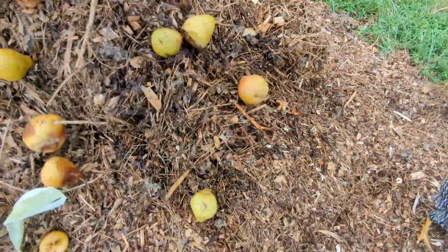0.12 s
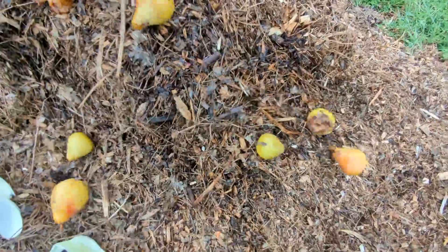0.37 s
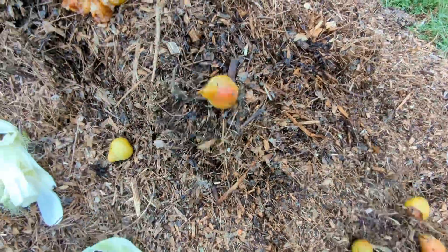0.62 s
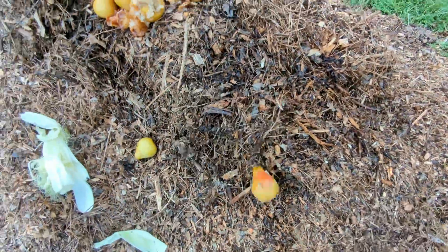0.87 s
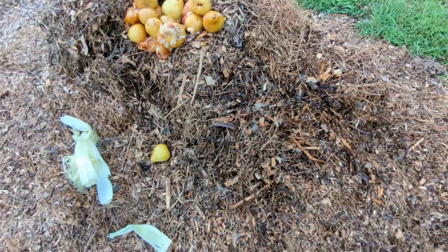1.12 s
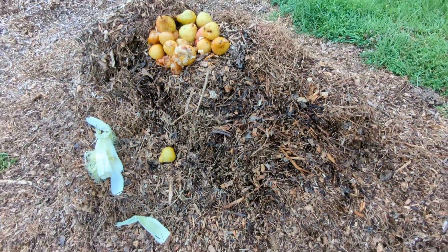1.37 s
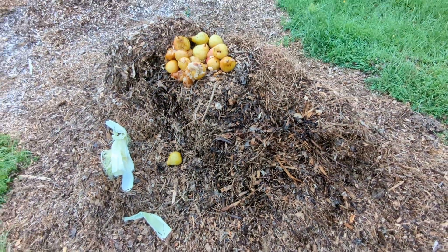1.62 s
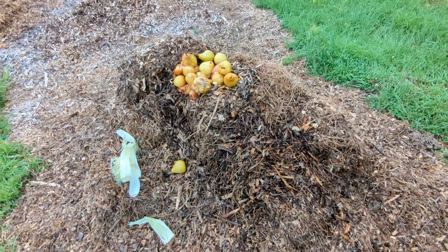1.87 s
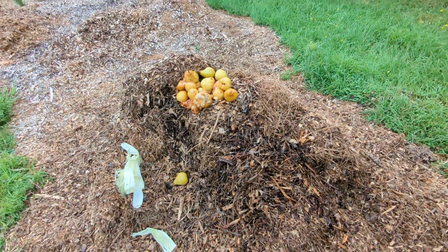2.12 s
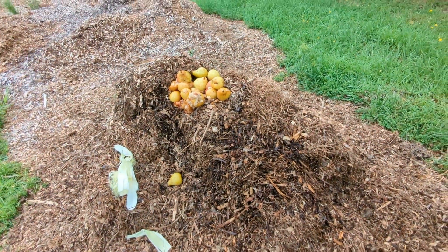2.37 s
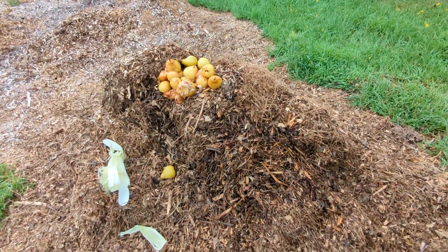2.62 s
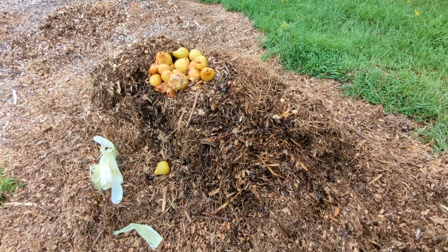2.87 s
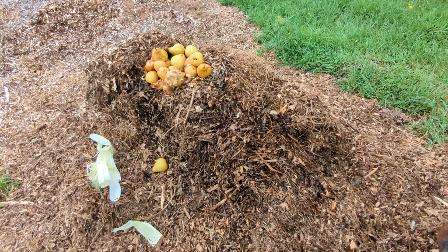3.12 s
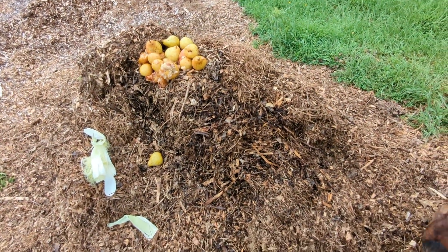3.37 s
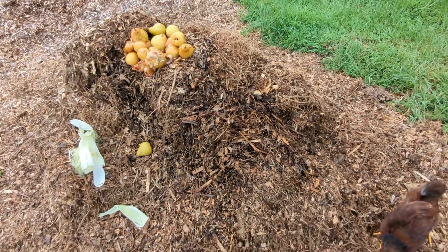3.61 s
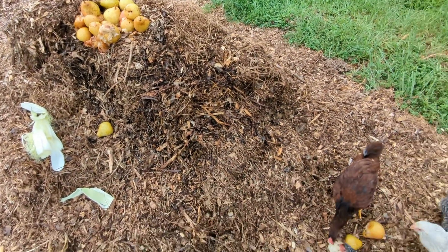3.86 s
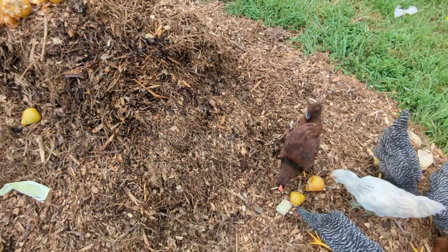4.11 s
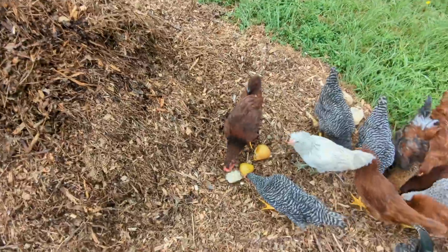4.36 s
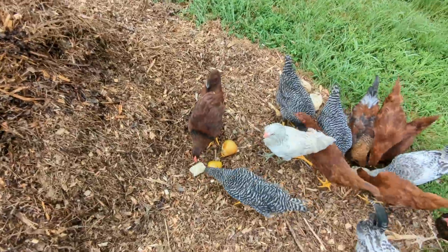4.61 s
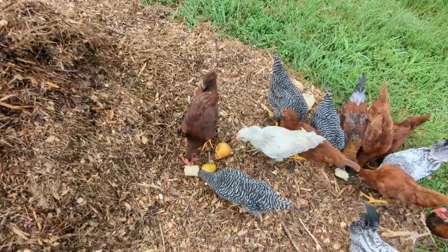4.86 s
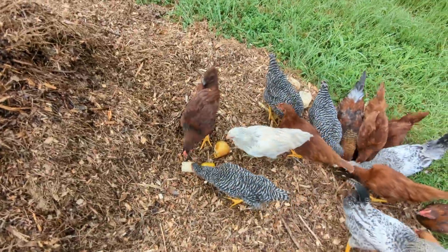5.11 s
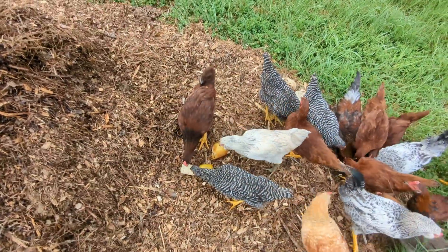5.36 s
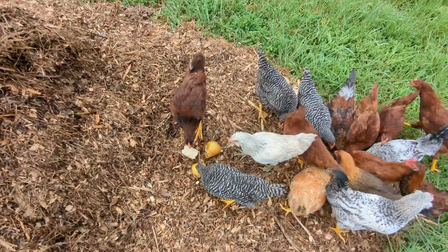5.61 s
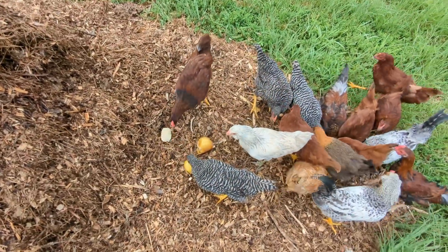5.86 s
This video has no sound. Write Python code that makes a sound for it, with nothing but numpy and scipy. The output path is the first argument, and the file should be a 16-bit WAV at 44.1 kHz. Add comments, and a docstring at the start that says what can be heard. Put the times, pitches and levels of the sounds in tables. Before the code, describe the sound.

Loud raspy clucking and rustling wood chips give way to quiet hen mutters, thin wavering whines and light beak taps in a yard.

```python
"""Around a pile of wood chips, hens cluck, coo and whine, peck at things and thump the pile.
Voices are rough syrinx pulses ringing in throat, mouth and beak; whines are wavering, breathy tones.
Thumps and pecks are damped rings with a crack. Rustling chips and the murmur of the yard are random
spectra, insects a narrow hiss, wind a lumpy rumble. A hand-held pair of microphones hears it all."""
import sys
import numpy as np
from scipy import signal
from scipy.fft import rfft, irfft
from scipy.io import wavfile
from scipy.ndimage import uniform_filter1d

SR = 44100
rng = np.random.default_rng(int(sys.argv[2]) if len(sys.argv) > 2 else 0)


def master(y):
    """Save y as 16-bit WAV."""
    cut = np.clip(np.atleast_2d(y).T, -1, 1)
    pcm = np.round(cut * 32767)  # scale
    wavfile.write(sys.argv[1], SR, pcm.astype(np.int16))


def makeup_ratio(level_db):
    """Linear amplitude ratio for a level in decibels (20 dB per factor of ten)."""
    decades = np.asarray(level_db, float) / 20
    return 10 ** decades


N = 263718

# Tilt of the microphone pair. Each row: frequency [Hz], left over right [dB].
PAIR_LEAN = [(60, 2), (150, -6), (380, -1.5), (950, -3), (2380, -10.5), (5980, 1.5), (15000, 2)]


def evened(x):
    """Scales to rms 1."""
    return x / np.sqrt(np.mean(x ** 2) + 1e-20)


def read(points, hz):
    """Reads a spectrum on a log-frequency axis."""
    f, value = np.transpose(points)
    return np.interp(np.log(hz + 1), np.log(f + 1), value)


def add(mix, s, sound):
    """Mixes a sound in at time s."""
    part = mix[round(s * SR):][:len(sound)]
    part += sound[:len(part)]


def resonate(x, hz, width):
    """A resonance of gain 1: shifts the moving frequency hz to zero, smooths, and shifts back."""
    turn = np.exp(2j * np.pi * np.cumsum(hz * np.ones(len(x))) / SR)
    r = np.exp(-np.pi * width / SR)
    return 2 * (turn * signal.lfilter([1 - r], [1, -r], x / turn)).real


def membrane(hz, rough, jitter=.13, shimmer_db=6., breathy=.2):
    """Syrinx pulses; roughness makes each cycle differ in length and strength and lets air through."""
    chance = rng.standard_normal((3, 8000))[:, :len(hz)]
    cycle = (np.cumsum(hz) / SR).astype(int)
    turns = np.cumsum(hz * np.exp(jitter * rough * chance[0, cycle])) / SR
    pulses = sum(np.cos(2 * np.pi * k * turns) for k in range(1, 13))
    strength = makeup_ratio(shimmer_db * rough * chance[1, (turns + .5).astype(int)])
    return evened(pulses * strength) + breathy * rough * chance[2]


def cluck(effort_db, hz, rough, bright_db, mouth_hz, beak_hz, beak_db):
    """Pulses ring in throat, mouth and beak; the voice brightens and the mouth rings as effort peaks."""
    # Throat resonances. Each row: frequency [Hz], width [Hz], level before brightness [dB].
    throat_modes = [(410, 474, -3.5), (939, 260, -0.5), (1367, 296, -1), (1963, 420, -5.5),
                    (2660, 750, -16), (4350, 1450, -34)]
    below_peak_db = effort_db - effort_db.max()  # 0 or negative
    # off the peak the voice is hoarser
    drive = membrane(hz, np.minimum(rough - .012 * below_peak_db, rough + .12))
    bright_db = bright_db + 0.25 * below_peak_db  # dB per octave around 1 kHz
    mouth_db = 34 + 1.05 * effort_db.max() + 1.65 * below_peak_db
    mouth_hz = mouth_hz * hz / hz.max()  # the ring follows the pitch
    beak_hz = beak_hz * np.exp(0.3 * below_peak_db)
    throat = 0
    for k, (f, width, db) in enumerate(throat_modes):
        mode = resonate(resonate(drive, f, width), f, 1.3 * width)
        throat = throat + (-1) ** k * makeup_ratio(db + bright_db * np.log2(f / 1000)) * mode
    beak = makeup_ratio(beak_db) * resonate(resonate(drive, beak_hz, 410), beak_hz, 570)
    mouth = resonate(resonate(drive, mouth_hz, 190), mouth_hz, 240)
    voice = throat + makeup_ratio(mouth_db) * (mouth + beak)
    # even out the running level, so that effort alone sets it
    loudness = np.sqrt(abs(uniform_filter1d(voice ** 2, 600)) + 1e-9)
    return makeup_ratio(effort_db) * voice / loudness * signal.windows.tukey(len(hz), .25)


def effort(rise, fall, peak_db):
    """Effort in dB: jumps to a shoulder, holds, pushes to a rounded peak and drops."""
    softest_db, round_s = -50.5, 0.0072
    reach_db = max(peak_db - softest_db, 4)
    t = np.arange(0, rise + fall, 1 / SR)
    at = [0, 0.23 * rise, 0.602 * rise, rise, rise + fall]
    # start, shoulder, end of hold, peak, end: shares of the reach lying under the peak
    depth = np.interp(t, at, [0.492, 0.397, 0.308, 0, 0.88])
    return peak_db - reach_db * uniform_filter1d(depth, round(round_s * SR), mode="nearest")


def call(rise, fall, db, top_hz, mouth_hz, rough, bright_db, beak_hz, beak_db):
    """Pitch climbs with effort and sags a little after the peak; a harder call is brighter."""
    effort_db = effort(rise, fall, db)
    rising = np.arange(len(effort_db)) < np.argmax(effort_db)
    sag_per_db = np.where(rising, .02, .00425)  # share of the pitch
    hz = top_hz * np.exp(sag_per_db * np.maximum(effort_db - db, -14))
    return cluck(effort_db, hz, rough, bright_db + 0.5255 * db, mouth_hz, beak_hz, beak_db)


def squawk(hens):
    """One startled squawk, the beak wide open: the mouth rings near the third harmonic."""
    # Course of the squawk. Each row: time in seconds, effort in dB, pitch in Hz.
    squawk_course = [(0.048, -30, 593), (0.065, -23.5, 651), (0.08, -10.5, 667), (0.1, -27, 585),
                     (0.121, -38, 560)]
    s, db, hz = np.transpose(squawk_course)
    t = np.arange(s[0], s[-1], 1 / SR)
    voice = cluck(np.interp(t, s, db), np.interp(t, s, hz), rough=.05, bright_db=9,
                  mouth_hz=1935, beak_hz=1310, beak_db=-24.5)
    add(hens, s[0], voice)


def boks(hens):
    """Voiced calls of the nearest hen, with little roughness and a half-open mouth."""
    # Each row: start in seconds, rise in seconds, fall in seconds,
    # effort aimed at before the peak is rounded in dB, top pitch aimed at in Hz.
    bok_calls = [(0.685, 0.035, 0.026, -14, 497.6), (0.812, 0.048, 0.02, -18, 495.3),
                 (0.948, 0.0267, 0.028, -28, 416), (1.07, 0.028, 0.025, -31, 368.3)]
    for s, *row in bok_calls:
        add(hens, s, call(*row, mouth_hz=990, rough=.14, bright_db=14.5, beak_hz=2440, beak_db=-5))


def clucks(hens):
    """Raspy clucks: very uneven pulses, each with a mouth ring of its own."""
    # Each row: start in seconds, rise in seconds, fall in seconds, effort aimed at before
    # the peak is rounded in dB, top pitch aimed at in Hz, mouth ring at the highest pitch in Hz.
    cluck_calls = [(0.128, 0.028, 0.035, -23, 615, 1156), (0.264, 0.02, 0.021, -19, 427, 1310),
                   (0.563, 0.045, 0.047, -20.5, 493.6, 926), (1.372, 0.057, 0.014, -31.5, 407, 840),
                   (2.15, 0.033, 0.066, -33.5, 395, 833), (2.296, 0.035, 0.0058, -26, 436, 816),
                   (2.435, 0.029, 0.0071, -29, 439.6, 1030), (5.79, 0.035, 0.058, -35.5, 433, 830)]
    for s, *row in cluck_calls:
        add(hens, s, call(*row, rough=.45, bright_db=16.5, beak_hz=2150, beak_db=1))


def mutters(hens):
    """Soft short clucks from the rest of the flock, with a gently arched level and pitch."""
    # Each row: start in seconds, length in seconds, peak effort in dB, top pitch in Hz,
    # brightness at the peak in dB per octave.
    mutter_calls = [(0.413, 0.022, -30.5, 347, 6), (1.235, 0.027, -41, 527, 2.5),
                    (1.49, 0.03, -37, 370, 1.5), (1.551, 0.032, -37, 436, -0.5),
                    (1.867, 0.041, -40.5, 373, 2.5), (1.905, 0.028, -44, 531, 0.5),
                    (2.005, 0.043, -39, 414, 1.5), (2.252, 0.034, -32.5, 404, -4.5),
                    (2.585, 0.035, -34, 405, -1.5), (2.803, 0.037, -36.5, 479, 1),
                    (2.974, 0.045, -52.5, 481, 2), (3.145, 0.032, -39, 387.4, -3.5),
                    (3.325, 0.059, -41.5, 404, -1), (3.382, 0.041, -40.5, 390, 2),
                    (3.981, 0.048, -49.5, 396, 0.5), (4.384, 0.03, -40.5, 315, 1.5),
                    (4.623, 0.029, -45, 432, 1), (4.77, 0.049, -42, 323.5, -4),
                    (4.944, 0.051, -46.5, 557, -0.5), (4.976, 0.053, -40, 373, 0.5),
                    (5.162, 0.018, -42, 410, 0.5), (5.316, 0.032, -40.5, 368.7, 0.5),
                    (5.482, 0.013, -42.5, 433, 2.5), (5.972, 0.035, -31, 456, 6.5)]
    for s, length, db, hz, bright_db in mutter_calls:
        below_db = 20 * (np.linspace(0, 1, round(length * SR)) - 0.574) ** 2
        pitch = hz * np.exp(-.0085 * below_db)
        add(hens, s, cluck(db - below_db, pitch, rough=.36, bright_db=bright_db,
                           mouth_hz=2 * hz, beak_hz=2330, beak_db=-37))


def coo(db, hz, length, mouth_hz):
    """Steady pulses through a closed beak: a few clean overtones on a sagging pitch."""
    u = np.linspace(0, 1, max(round(length * SR), 200))
    drive = membrane(hz * (1 - 0.19 * u ** 2), .08)
    mouth = resonate(resonate(drive, mouth_hz, 230), mouth_hz, 700)
    broad = makeup_ratio(-10.0) * resonate(resonate(drive, 320, 850), 960, 1800)
    return makeup_ratio(db - 2.6 * u) * evened(mouth - broad) * signal.windows.tukey(len(u), .3)


def coos(hens):
    """Clear coos, each with its own mouth resonance."""
    # Each row: start in seconds, level before it sags in dB, first pitch in Hz, length in seconds,
    # mouth resonance in Hz.
    coo_calls = [(1.006, -44, 396, 0.029, 375), (1.451, -41, 389, 0.052, 760),
                 (1.165, -54, 342, 0.023, 680), (1.575, -48.5, 417, 0.028, 405),
                 (1.712, -47, 378, 0.067, 348), (2.483, -44.5, 448, 0.023, 885),
                 (2.748, -42.5, 403, 0.047, 720), (2.839, -47.5, 355, 0.044, 352),
                 (3.109, -44.5, 385, 0.075, 390), (4.276, -51.5, 458, 0.088, 1100),
                 (5.75, -54, 318, 0.059, 330)]
    for s, *row in coo_calls:
        add(hens, s, coo(*row))


def whistle(db, hz, unsteady, fade_s=0.0069):
    """A wavering, breathy tone with an octave that is strong on low whines and faint on high ones."""
    # The octave against its tone. Each row: frequency of the octave [Hz], level [dB].
    octave_level = [(1500, 3), (1900, -11), (2450, -13), (3000, -38)]
    chance = rng.standard_normal((2, 16000))
    waver = evened(uniform_filter1d(chance[0], 150))[:len(hz)]
    phase = 2 * np.pi * np.cumsum(hz * (1 + unsteady * waver)) / SR  # unsteady: share of the pitch
    tone = np.sin(phase) + makeup_ratio(read(octave_level, 2 * hz)) * np.sin(2 * phase)
    air = makeup_ratio(-14) * evened(resonate(chance[1, :len(hz)], hz, 160))  # escapes around the tone
    fade = signal.windows.tukey(len(hz), min(2 * fade_s * SR / len(hz), 1))
    return np.sqrt(2) * makeup_ratio(db + 1.37 * waver[::-1]) * (tone + air) * fade


def whines(whiners):
    """Short whines, as straight slides; some rows are overtones or successive parts of one whine."""
    # Each row: start in seconds, length in seconds, level around which it wavers in dB,
    # first pitch in Hz, last pitch in Hz.
    whine_slides = [(1.513, 0.022, -43, 1160, 1000), (2.005, 0.041, -40, 934, 1074),
                    (2.178, 0.045, -43, 2260, 1944), (2.188, 0.051, -44.5, 1137, 990),
                    (3.262, 0.045, -54, 1268, 1254), (1.835, 0.049, -51, 1210, 1350),
                    (2.105, 0.04, -54, 2730, 2500), (2.255, 0.047, -56, 2800, 2760),
                    (2.845, 0.051, -53.5, 1447, 1400), (3.29, 0.086, -46, 1275, 1220),
                    (3.3, 0.06, -50, 879, 785), (3.495, 0.019, -52, 755, 870),
                    (3.512, 0.074, -50, 832, 938), (4.565, 0.064, -53, 1282, 1263),
                    (4.835, 0.04, -47, 1498, 1402), (4.96, 0.039, -49.5, 564, 908),
                    (5.27, 0.082, -51, 1400, 1517), (5.345, 0.037, -47, 1450, 890),
                    (5.415, 0.035, -49, 1030, 1310), (5.43, 0.053, -45.5, 1620, 1700),
                    (5.455, 0.051, -54, 1290, 1197), (3.3, .08, -72, 2570, 2390),
                    (5.525, 0.04, -53.5, 2730, 2360), (5.52, 0.0098, -48, 1130, 1480),
                    (5.555, 0.038, -47.5, 1470, 990), (5.627, 0.044, -42, 990, 1070),
                    (5.66, 0.033, -44, 1450, 1310)]
    for s, length, db, first_hz, last_hz in whine_slides:
        hz = np.geomspace(first_hz, last_hz, round(length * SR))
        add(whiners, s, whistle(db, hz, unsteady=.022))


def long_whines(whiners):
    """Two long whines by one hen, each wandering through several pitches in one breath."""
    # One list for each whine. Each row: time in seconds, level around which it wavers in dB,
    # pitch before smoothing in Hz.
    whine_courses = [
        [(4.725, -46, 1585), (4.745, -49.5, 1518), (4.768, -41.5, 1184), (4.82, -43, 1170),
         (4.878, -45.5, 1276), (4.888, -42.5, 1402), (4.914, -46, 1465), (4.924, -48.5, 1645),
         (4.945, -44.5, 1410), (5.0, -48, 1430), (5.035, -46, 1355)],
        [(5.078, -37.5, 952), (5.1, -40, 1033), (5.125, -45, 1058), (5.14, -47.5, 1462), (5.2, -48.5, 1365),
         (5.238, -57, 1380), (5.25, -53, 1550), (5.31, -59, 1625)],
    ]
    for rows in whine_courses:
        s, db, hz = np.transpose(rows)
        t = np.arange(s[0], s[-1], 1 / SR)
        pitch = uniform_filter1d(np.interp(t, s, hz), size=300)
        add(whiners, s[0], whistle(np.interp(t, s, db), pitch, unsteady=.01))


def knock(db, hz, t60):
    """A damped ring of the struck thing plus a brief crack; it takes at least 2 ms to fall 60 dB."""
    t = np.arange(2000) / SR
    ring = np.sin(2 * np.pi * hz * t) * makeup_ratio(-60 * t / max(t60, .002)) * (1 - np.exp(-t / 0.000097))
    crack = 0.18 * rng.standard_normal(len(t)) * np.exp(-t / 0.0055) * min(hz / 3000, 1)
    return makeup_ratio(db) * (ring + crack)


def thumps(hens):
    """Feet and beaks thump the pile: the ring dies within a few cycles."""
    # Each row: start in seconds, level before damping in dB, ring in Hz.
    thump_hits = [(0.605, -8, 1540), (0.447, -23, 447), (1.129, -20, 2340), (1.217, -23.5, 536),
                  (2.908, -39, 454), (3.091, -29.5, 460), (3.704, -30, 480), (4.255, -30, 496),
                  (4.869, -27.5, 870), (5.004, -23.5, 1490), (5.631, -27.5, 780)]
    for s, db, hz in thump_hits:
        add(hens, s, knock(db, hz, t60=2.9 / hz))


def pecks(hens):
    """Beaks tap something hard and hollow, which rings on for longer."""
    # Each row: start in seconds, level before damping in dB, ring in Hz.
    peck_hits = [(0.536, -31, 2430), (1.3444, -25.5, 2030), (2.0612, -41, 2080), (5.1665, -30.5, 2360),
                 (5.3246, -29, 2260), (5.4828, -35.5, 2410), (5.8198, -31, 2200)]
    for s, db, hz in peck_hits:
        add(hens, s, knock(db, hz, t60=0.03))


def ports(x, lag_s, lean_db):
    """The ports differ in colour; above the bass the left lags; each gets a short, dense scatter of echoes."""
    hz = np.fft.rfftfreq(N, 1 / SR)
    above_bass = hz ** 2 / (hz ** 2 + 900 ** 2)
    lag = np.exp(-1j * np.pi * hz * lag_s * above_bass)
    half = makeup_ratio(.5 * (read(PAIR_LEAN, hz) + lean_db)) * lag  # half of the difference for each port
    direct = irfft(rfft(x) * np.array([half, 1 / half]), N)
    t = np.arange(2500) / SR
    # random ground echoes
    scatter = rng.standard_normal((2, len(t))) * (rng.random((2, len(t))) < .04)
    echoes = scatter * makeup_ratio(-60 * t / 0.07) * (t > .002)
    echoes = echoes / np.linalg.norm(echoes[0])
    return direct + makeup_ratio(-7.5) * signal.fftconvolve(direct, echoes, axes=1)[:, :N]


def hiss(spectrum, level_db, patchy_db, flicker_db, swell_db):
    """Random short-time spectra with patches, flicker and swell, partly alike at the two ports."""
    # Each row: frequency [Hz], left-right likeness [0-1].
    likeness = [(60, 0.95), (290, 1), (700, 0.47), (1500, 0.65), (3000, 0.17)]
    frames, hz = N // 128 + 5, np.fft.rfftfreq(512, 1 / SR)
    a, b, c, d, chance = rng.standard_normal((frames, 257, 5)).T  # each: frequency by time
    flicker = evened(uniform_filter1d(uniform_filter1d(chance, 150, 0), 3, 1))
    swell = evened(uniform_filter1d(chance.mean(0), 24))
    patches = evened(uniform_filter1d(uniform_filter1d(chance, 8, 0), 20, 1))
    same = np.clip(read(likeness, hz), -1, 1)[:, None]
    left = a + 1j * b
    z = np.array([left, same * left + np.sqrt(1 - same ** 2) * (c + 1j * d)])
    uneven_db = patchy_db * patches + flicker_db * flicker + swell_db * swell
    z *= makeup_ratio(read(spectrum, hz)[:, None] + uneven_db)
    z *= makeup_ratio(np.outer([.5, -.5], read(PAIR_LEAN, hz)))[:, :, None]
    return makeup_ratio(level_db) * evened(signal.istft(z, nperseg=512, noverlap=384)[1][:, :N])


def rustle(level_db):
    """Chips rustling nearby: a hiss with a lively flicker."""
    # Each row: frequency [Hz], relative density [dB per Hz].
    rustle_spectrum = [(120, -13), (200, -1), (517, -26), (610, -33), (848, -26), (1640, -11.5), (2450, -2),
                       (8030, -14.5), (11800, -3), (15800, -24)]
    return hiss(rustle_spectrum, level_db, patchy_db=1.5, flicker_db=2.5, swell_db=1.2)


def yard(level_db):
    """The distant murmur of the yard: a fairly smooth hiss."""
    # Each row: frequency [Hz], relative density [dB per Hz].
    yard_spectrum = [(29, -38), (50, -4), (81, -10.5), (257, -21), (352, -2.5), (700, -10), (1500, -11.5),
                     (2050, -0.5), (2600, -11.5), (3720, -20), (5890, -18), (6970, -11.5), (8050, -30),
                     (12100, -16), (15800, -26.5)]
    return hiss(yard_spectrum, level_db, patchy_db=1.6, flicker_db=.7, swell_db=1.3)


def insects():
    """A steady narrow hiss from the grass, unrelated at the two ports."""
    hz, width_hz, db = 7100, 690, -66.5
    edges = (hz - width_hz / 2, hz + width_hz / 2)
    band = signal.butter(2, edges, "band", fs=SR, output="sos")
    return makeup_ratio(db) * evened(signal.sosfilt(band, rng.standard_normal((2, N))))


def wind(t):
    """Lumpy rumble, unrelated at the two ports and stronger in the left."""
    # The microphones swing, then come to rest.
    # Each row: time in seconds, level midway between the ports and before the lumps in dB.
    gusts = [(0, -57), (0.7, -57.5), (1.0, -74), (1.2, -56.5), (1.45, -73), (1.73, -54), (1.95, -66),
             (2.2, -57.5), (2.35, -80.5), (5.98, -75)]
    hz = np.fft.rfftfreq(N, 1 / SR)
    shape = read([(35, -46), (60, 11.0), (130, 0.5), (220, -3.0), (320, -29), (600, -64)], hz)
    rumble = irfft(rfft(rng.standard_normal((2, N))) * makeup_ratio(shape), N)
    lumps = evened(uniform_filter1d(rng.standard_normal((2, N)), 2500, 1))
    level_db = np.interp(t, *np.transpose(gusts))
    return makeup_ratio(level_db + 4 * lumps + np.array([[1.5], [-1.5]])) * evened(rumble)


def scene():
    """Hens, thumps and pecks over rustle, yard murmur, insects and wind."""
    # Commotion around the pile. Each row: time in seconds, rustling chips in dB, murmur of the yard in dB.
    commotion = [(0, -48, -40.5), (0.3, -44.5, -43), (0.5, -48.5, -46.5), (0.65, -43.5, -41),
                 (1.05, -51, -49.5), (1.15, -50.5, -48), (1.4, -51.5, -48), (2.05, -55, -51),
                 (2.4, -58, -52), (2.8, -57.5, -49), (3.1, -60, -52), (3.9, -63.5, -50.5),
                 (4.05, -58.5, -59.5), (4.2, -68, -53.5), (4.4, -59.5, -54), (4.9, -72, -53),
                 (5.2, -55, -50.5), (5.4, -66, -49.5), (5.85, -60.5, -55), (5.98, -80, -47.5)]
    hens, whiners = np.zeros((2, N))
    for source in (squawk, boks, clucks, mutters, coos):
        source(hens)
    for source in (whines, long_whines):
        source(whiners)
    for source in (thumps, pecks):
        source(hens)
    t = np.arange(N) / SR
    near = t < 1.15  # the startled hens are close by until the holder steps back
    flock = ports(hens * near, lag_s=0.00023, lean_db=0.03)
    flock = flock + ports(hens * ~near, lag_s=.00006, lean_db=0.15)
    flock = flock + ports(whiners, lag_s=.0001, lean_db=0.98)
    s, rustle_db, murmur_db = np.transpose(commotion)
    chips = rustle(np.interp(t, s, rustle_db))
    murmur = yard(np.interp(t, s, murmur_db))
    return flock + chips + murmur + insects() + wind(t)


def top_cut(x):
    """Nothing passes above the cut-off."""
    return signal.sosfilt(signal.butter(12, 15830, fs=SR, output="sos"), x)


def record(dry):
    """The microphones cut the deepest bass."""
    bass_cut = signal.butter(4, 52., "high", fs=SR, output="sos")
    return top_cut(signal.sosfilt(bass_cut, dry))


dry = scene()
out = record(dry)
master(out)
```